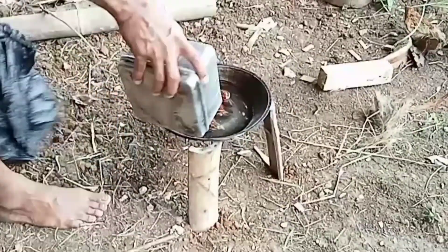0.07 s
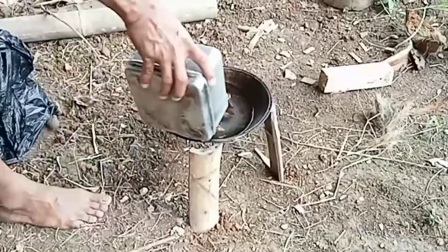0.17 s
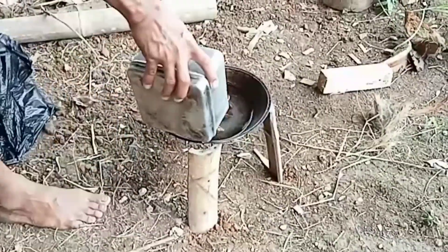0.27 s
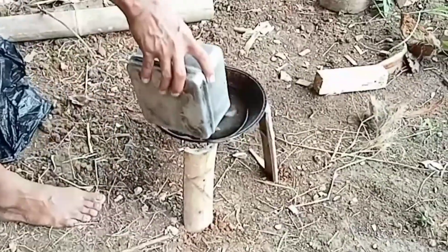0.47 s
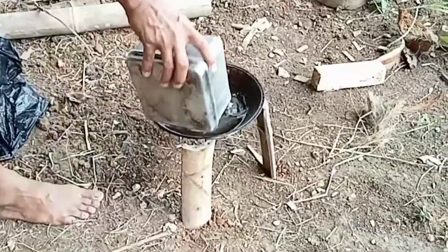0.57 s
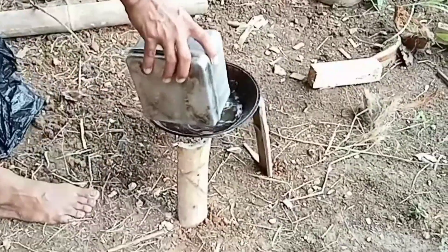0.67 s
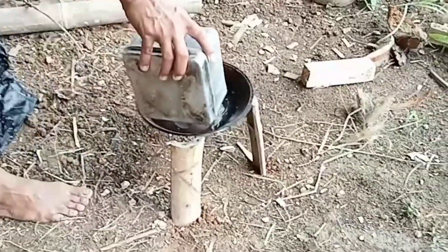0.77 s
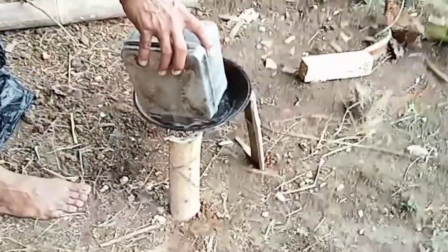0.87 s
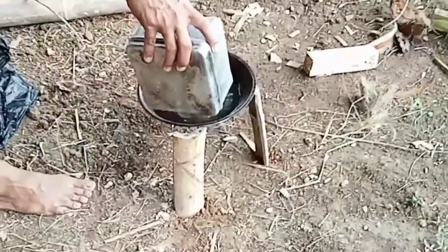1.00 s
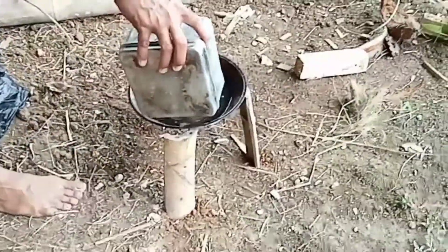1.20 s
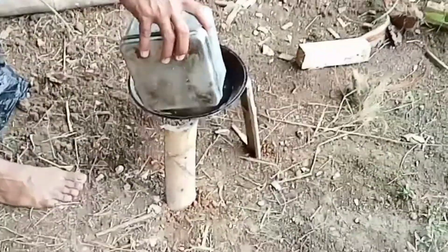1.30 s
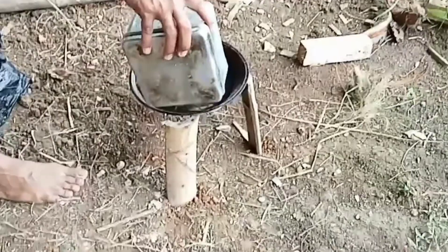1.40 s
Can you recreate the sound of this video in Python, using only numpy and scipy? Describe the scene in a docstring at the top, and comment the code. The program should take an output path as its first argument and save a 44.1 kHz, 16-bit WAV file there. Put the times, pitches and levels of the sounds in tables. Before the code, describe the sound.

Hard shells clatter from a tipped tin box into a metal pan, close by. A plastic bag crinkles softly at the start and fades. From about 0.1 to 0.8 seconds the shells slide, rattle and knock hollowly against the box. They then click against the pan and each other, settling by 1.3 seconds, with one faint knock near 1.4. Quiet outdoor air, a low hum and a high whine continue underneath.

```python
"""Hard shells tumble from a tipped tin box into a metal pan, outdoors and close by.
A low hum and a high, insect-like whine sound throughout. At first a plastic bag crinkles, then fades.
The shells slide, rattle and strike the box, exciting the hollow, damped modes of its wall.
Last they click against the pan and each other as they settle, and one faint knock follows."""
import sys
import numpy as np
from scipy import signal
from scipy.fft import rfft, irfft
from scipy.io import wavfile

SR = 44100
rng = np.random.default_rng(int(sys.argv[2]) if len(sys.argv) > 2 else 0)


def transcribe(u):
    """Save the signal u as a 16-bit wav file named by the first command-line argument.

    u: samples, shape (n,) or (channels, n), limited to [-1, 1]; the rate is SR.
    q: integer samples, one column per channel.
    """
    v = np.clip(np.atleast_2d(u).T, -1, 1)
    q = np.round(v * 32767).astype(np.int16)
    wavfile.write(sys.argv[1], SR, q)


N = 63945

# Spectra of the outdoor air and the plastic bag: frequency_hz, density_db
AIR_SPECTRUM = [(20, -27), (60, -8), (180, -4), (350, -16), (2300, -33), (15500, -56)]
BAG_SPECTRUM = [(150, -15.5), (1100, -10), (1800, 1), (4200, -3), (6300, -12), (8800, -2.5), (15500, -16.5)]
# Envelope of the rustle: time_s, level_db
BAG_ENVELOPE = [(0.059, -35.5), (.17, -46.5), (.28, -37.5), (.62, -49), (.72, -43), (.8, -53), (1.2, -62)]
# Decay of reflections from the pan, ground and surroundings: frequency_hz, t60_s
ECHO_DECAY = [(300, 0.25), (3000, 0.32), (6000, 0.26), (14000, 0.052)]
# Envelopes of sliding shells, on the wall and on each other: time_s, wall_db, shell_db
SLIDE_ENVELOPES = [(.05, -53, -55), (0.234, -39, -42.5), (.29, -27, -34), (.42, -35.5, -36.5),
                   (.52, -40, -43), (.64, -48, -51.5), (.69, -33.5, -30.5), (.78, -41, -42.5),
                   (1.2, -76, -61)]
# Spectra of a clack on the box, a clack on pan or shell, and a sharp tick: frequency_hz, density_db
KNOCK_SPECTRUM = [(250, -16.5), (1700, -3), (2350, 3), (3000, -12), (3600, 0.5), (4700, -8), (7000, -21.5)]
SHELL_SPECTRUM = [(100, -42), (450, -11.5), (1500, -3.5), (3100, 3.5), (4400, 2), (6000, -26)]
TICK_SPECTRUM = [(2500, -13), (5000, -2), (6700, -5), (8400, 5.5), (12000, -8), (15500, -5)]
# Modes of the loaded pan and of the box: frequency_hz, gain_db, t60_s
PAN_MODES = [(471.5, -15.5, 0.13), (2186, 3.5, 0.028), (3000, -11.5, 0.28)]
BOX_MODES = [(606, -14, 0.18), (717.5, -14, 0.2), (1273, -5.5, 0.092), (1471, -12, 0.11), (2227, -10, 0.21),
             (2426, -3, 0.14), (3700, -21.5, .18)]
# Impacts on the pan or other shells: start_s, ping_hz, ping_db, clack_db, tick_db
PAN_IMPACTS = [(0.188, 2433, -28.5, -33, -34.5), (0.2474, 4340, -33.5, -32, -37),
               (0.4502, 2110, -27.5, -35, -33), (0.6365, 4110, -33, -47, -42),
               (0.8571, 4230, -38, -43, -46), (0.881, 2510, -54, -49, -46.5), (0.9322, 3340, -27, -25, -23),
               (0.9445, 2080, -32, -36.5, -49), (0.9525, 2970, -40, -41, -36.5),
               (0.958, 3510, -43, -32, -43), (0.9763, 4330, -38, -31, -36), (1.0035, 2176, -37, -43, -49),
               (1.0209, 3010, -41, -43.5, -51), (1.055, 2220, -46, -54, -64),
               (1.0876, 2790, -50.5, -48, -51), (1.1721, 2130, -43, -43.5, -38.5),
               (1.2415, 2240, -58, -65, -70), (1.2934, 2180, -56, -54, -71)]
# Impacts on the box: start_s, wall_hz, wall_db, overtone_db, ping_hz, clack_db, tick_db
BOX_IMPACTS = [(0.135, 732, -25, -31, 2420, -35.5, -40), (0.1927, 730, -31, -33.5, 2400, -44, -54),
               (0.2075, 711, -22, -39, 2470, -53, -47), (0.2505, 824, -27.5, -57, 2360, -36, -38.5),
               (0.258, 660, -19, -20, 2280, -36, -35), (0.263, 678, -19, -54, 2420, -34.5, -40),
               (0.284, 623, -26, -41, 1980, -38.5, -38.5), (0.306, 712, -21.5, -37, 3500, -40.5, -47),
               (0.3572, 682, -19, -37, 3580, -29.5, -54), (0.3728, 731, -26, -37, 2310, -26, -35),
               (0.3795, 661, -17.5, -19.5, 2000, -31, -23), (0.385, 646, -27.5, -25.5, 2005, -23, -37),
               (0.394, 695, -26, -24.5, 3816, -23, -30), (0.459, 640, -28.5, -42, 2203, -28.5, -46),
               (0.5661, 717, -21, -24.5, 2454, -25.5, -39.5), (0.6566, 700, -17, -39, 3520, -19.5, -24),
               (0.667, 593, -22.5, -42, 2080, -29, -33.5), (0.678, 820, -40, -54, 2335, -28.5, -32.5),
               (0.7275, 761, -30.5, -30, 3630, -30, -35), (0.795, 734, -25.5, -43, 2320, -42, -64),
               (0.8105, 548, -30.5, -33, 3553, -31, -35.5), (0.8235, 638, -44, -35, 2367, -30.5, -47),
               (1.44, 844, -58.5, -53.5, 2370, -68, -70)]

WALL_PEAK_S, OVERTONE_PEAK_S, OVERTONE_HZ = 0.0031, 0.0023, 1425
CLACK_RISE_S = 0.00037


def amp(db):
    """Amplitude grows tenfold with every 20 dB."""
    return 10 ** (np.asarray(db) / 20)


def unit_rms(x, span=None):
    """Normalisation to unit rms over the first span samples, or over all."""
    return x / np.sqrt(np.mean(x[:span] ** 2) + 1e-20)


def unit_attack(x):
    """An impact's strength is its rms over the first 8 ms, here set to one."""
    return unit_rms(x, span=353)


def value_at(curve, hz):
    """Interpolation on a logarithmic frequency axis."""
    f, value = np.transpose(curve)
    return np.interp(np.log(hz + 1), np.log(f + 1), value)


def filtered(x, spectrum):
    """Filtering multiplies each frequency component by a gain."""
    hz = np.fft.rfftfreq(len(x), 1 / SR)
    return irfft(rfft(x) * amp(value_at(spectrum, hz)), len(x))


def add(mix, start_s, sound):
    """Superposition: a sound adds to the mix from its start time."""
    part = mix[max(round(start_s * SR), 0):][:len(sound)]
    part += sound[:len(part)]


def impulses(per_s, spread_db):
    """A Poisson process: tiny independent impacts of uneven size."""
    size = amp(spread_db * np.minimum(rng.exponential(1, N), 4)) * rng.choice([-1, 1], N)
    return size * (rng.random(N) < per_s / SR)


def narrow_band(hz, half_width_hz):
    """Neighbouring components of narrow-band noise beat, giving a wavering tone."""
    detuning = (np.fft.rfftfreq(N, 1 / SR) - hz) / half_width_hz
    return unit_rms(irfft(rfft(rng.standard_normal(N)) / (1 + detuning ** 2), N))


def background():
    """Broadband outdoor noise lies under two narrow bands, heard as a hum and a whine."""
    air = amp(-57.5) * unit_rms(filtered(rng.standard_normal(N), AIR_SPECTRUM))
    hum = amp(-60.5) * narrow_band(hz=94.2, half_width_hz=4.9)
    whine = amp(-63) * narrow_band(hz=9510, half_width_hz=160)
    return air + hum + whine


def bag_rustle():
    """Shot noise: dense crinkles of plastic merge into a rustle."""
    level_db = np.interp(np.arange(N) / SR, *np.transpose(BAG_ENVELOPE))
    return amp(level_db) * unit_rms(filtered(impulses(per_s=5000, spread_db=2), BAG_SPECTRUM))


def echoes(x, build_s=0.0058):
    """Diffuse reflections form a short tail that decays fastest in the high treble."""
    hz, t, noise = signal.stft(rng.standard_normal(SR // 2), SR, nperseg=256)
    decay = amp(-60 * t / value_at(ECHO_DECAY, hz)[:, None])
    tail = signal.istft(noise * decay, SR, nperseg=256)[1]
    tail *= 1 - np.exp(-(np.arange(len(tail)) / SR / build_s) ** 2)
    return signal.fftconvolve(x, tail / np.linalg.norm(tail))[:N]


def ring(modes, t, count=3, scatter=0.0154):
    """The moving load splits and shifts each decaying mode into a beating cluster."""
    out = np.zeros(len(t))
    for hz, gain_db, t60_s in modes:
        for _ in range(count):
            split_hz = hz * (1 + scatter * rng.standard_normal())
            out += amp(gain_db - 60 * t / t60_s) * np.sin(2 * np.pi * (split_hz * t + rng.random()))
    return out / np.sqrt(count) * (1 - np.exp(-t / CLACK_RISE_S))


def thud(hz, peak_s, t):
    """A heavily damped wall mode swells and dies within a few cycles."""
    return unit_attack((t / peak_s) ** 2 * np.exp(-2 * t / peak_s) * np.sin(2 * np.pi * hz * t))


def ping(hz, t, fall_s=0.0048):
    """Free vibration of a shell or a spot of metal: a short note with an inharmonic overtone."""
    phase = 2 * np.pi * hz * t
    tone = np.sin(phase) + amp(-13.5) * np.sin(1.7 * phase)
    return unit_attack(tone * (1 - np.exp(-t / CLACK_RISE_S)) * np.exp(-t / fall_s))


def contact(spectrum, t, fall_s, rise_s=CLACK_RISE_S, variety_db=4):
    """Many short-lived modes overlap into a noise burst; each shell favours its own few."""
    hz = np.arange(0, SR / 2, 450)
    own_spectrum = np.transpose([hz, variety_db * rng.standard_normal(len(hz))])
    burst = filtered(filtered(rng.standard_normal(len(t)), spectrum), own_spectrum)
    return unit_attack(burst * (1 - np.exp(-(t / rise_s) ** 2)) * np.exp(-t / fall_s))


def tick(t, fall_s=0.0036):
    """An abrupt contact excites a shell's highest modes."""
    return contact(TICK_SPECTRUM, t, fall_s, rise_s=0.000065)


def rattle(taps, per_s=330):
    """Convolution with random impulses repeats each tap at irregular times."""
    trains = (signal.fftconvolve(impulses(per_s / len(taps), spread_db=2.5), tap)[:N] for tap in taps)
    return unit_rms(sum(trains))


def sliding_shells(count=6):
    """A shifting heap makes many small collisions: thuds on the wall, clacks between shells."""
    time_s, wall_db, shell_db = np.transpose(SLIDE_ENVELOPES)
    now, t = np.arange(N) / SR, np.arange(SR // 20) / SR
    wall_hz = np.linspace(582, 796, count)
    thuds = [thud(hz, WALL_PEAK_S, t) + thud(OVERTONE_HZ * hz / wall_hz.mean(), OVERTONE_PEAK_S, t)
             for hz in wall_hz]
    clacks = [contact(SHELL_SPECTRUM, t, fall_s=0.0035) + amp(-31) * tick(t, fall_s=0.0018)
              for _ in range(count)]
    on_wall = amp(np.interp(now, time_s, wall_db)) * rattle(thuds)
    on_shells = amp(np.interp(now, time_s, shell_db)) * rattle(clacks)
    return on_wall + on_shells


def pan_clicks():
    """Hard impacts excite high modes: the shell pings and the pan rings briefly."""
    out, t = np.zeros(N), np.arange(SR // 4) / SR
    for start_s, ping_hz, ping_db, clack_db, tick_db in PAN_IMPACTS:
        clack = contact(SHELL_SPECTRUM, t, fall_s=0.0062) + ring(PAN_MODES, t)
        add(out, start_s, amp(clack_db) * clack + amp(tick_db) * tick(t) + amp(ping_db) * ping(ping_hz, t))
    return out


def box_knocks():
    """A collision excites both bodies: the wall flexes and rings, the shell clacks and pings."""
    out, t = np.zeros(N), np.arange(SR // 4) / SR
    for start_s, wall_hz, wall_db, overtone_db, ping_hz, clack_db, tick_db in BOX_IMPACTS:
        wall = amp(wall_db) * thud(wall_hz, WALL_PEAK_S, t)
        wall += amp(overtone_db) * thud(OVERTONE_HZ, OVERTONE_PEAK_S, t)
        clack = contact(KNOCK_SPECTRUM, t, fall_s=0.0076) + amp(-2.5) * ping(ping_hz, t)
        shell = amp(clack_db) * clack + amp(tick_db) * tick(t)
        box = amp((wall_db + clack_db) / 2) * ring(BOX_MODES, t)
        add(out, start_s, wall + shell + box)
    return out


def scene(radiation_hz=304):
    """The sources superpose; small bodies radiate poorly in the bass, so the shells are high-passed."""
    hits = box_knocks() + pan_clicks()
    shells = hits + amp(-11) * echoes(hits) + sliding_shells()
    radiation = signal.butter(2, radiation_hz, btype="high", fs=SR, output="sos")
    return (signal.sosfilt(radiation, shells) + bag_rustle() + background())[None]


def record(dry, cutoff_hz=15650):
    """Band limiting: a low-pass filter removes the highest treble."""
    lowpass = signal.firwin(301, cutoff_hz, window=("kaiser", 8), fs=SR)
    return signal.oaconvolve(dry, lowpass[None], "same")


dry = scene()
out = record(dry)
transcribe(out)
```